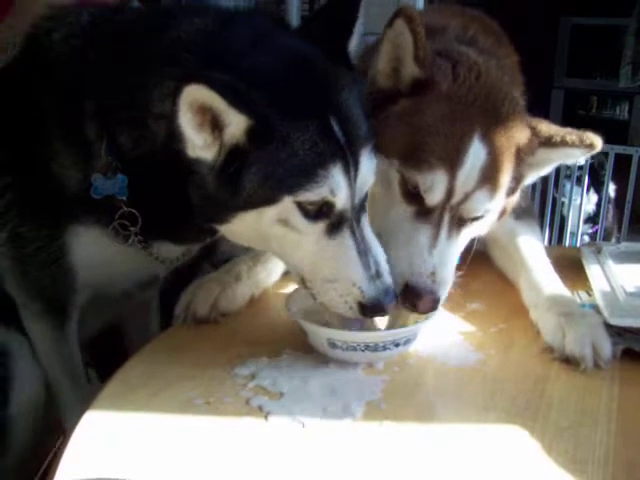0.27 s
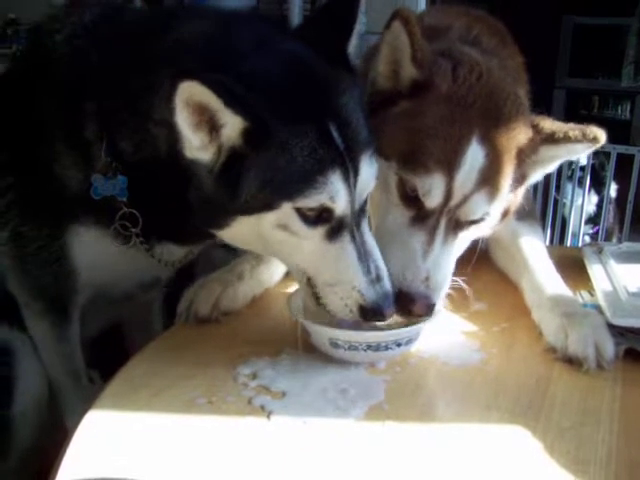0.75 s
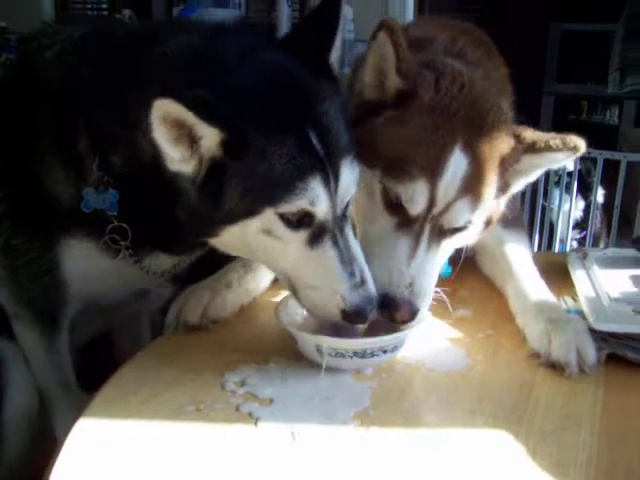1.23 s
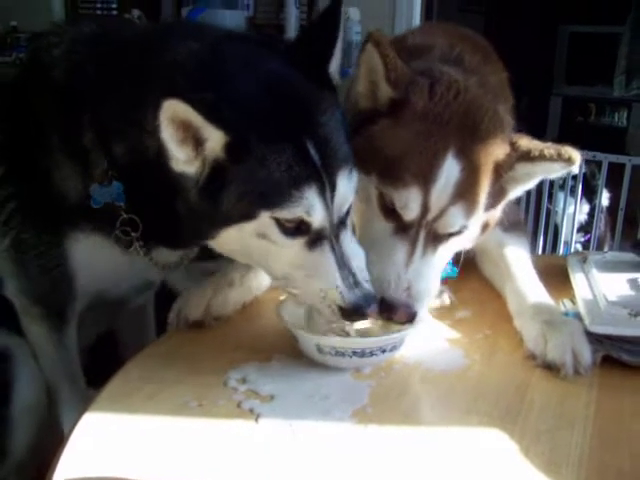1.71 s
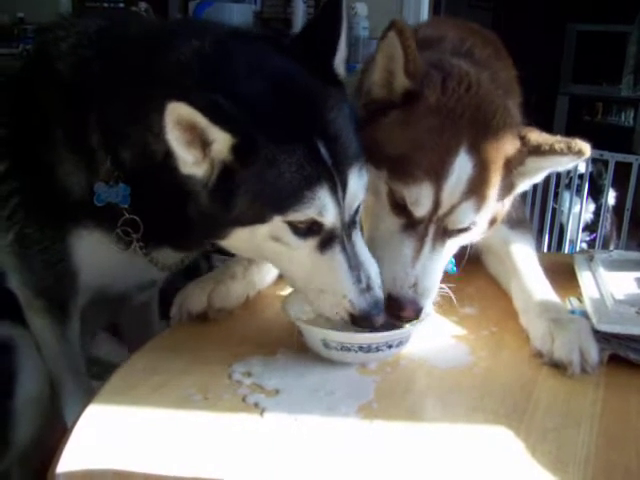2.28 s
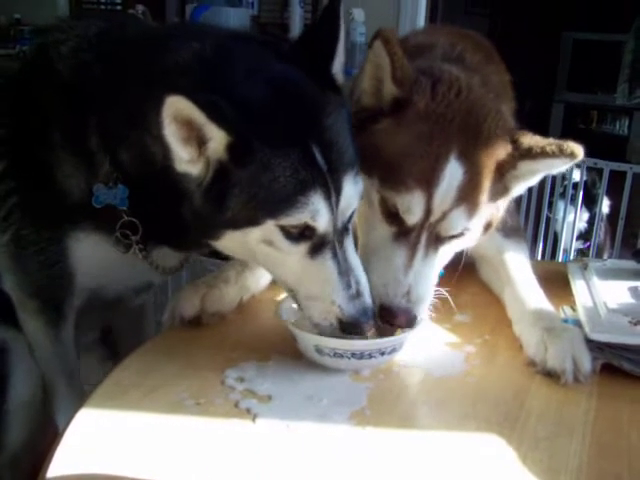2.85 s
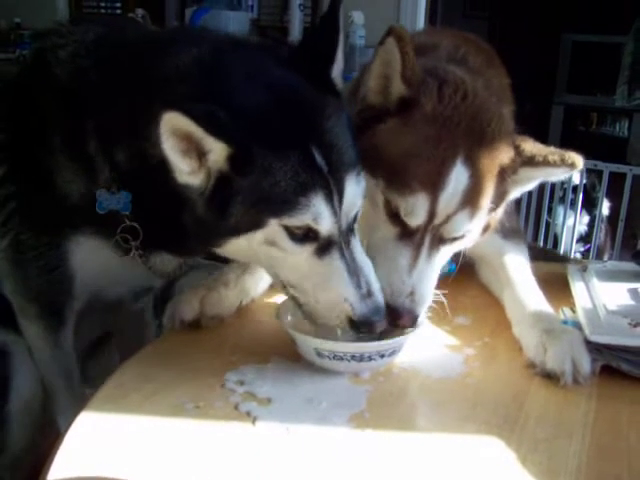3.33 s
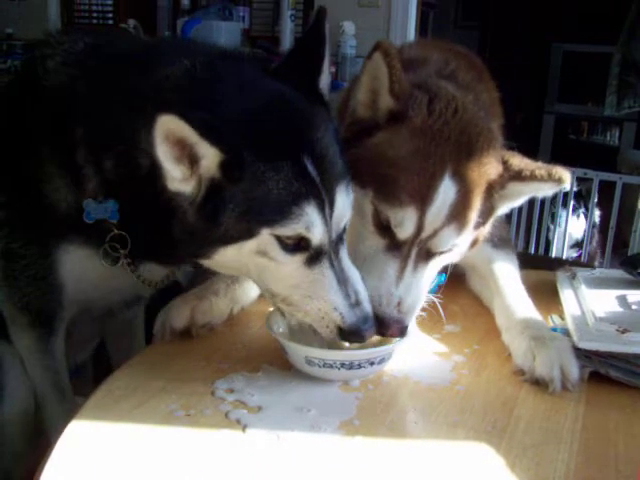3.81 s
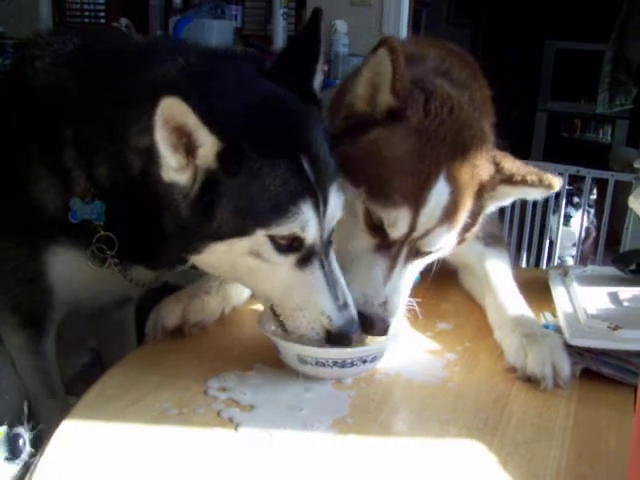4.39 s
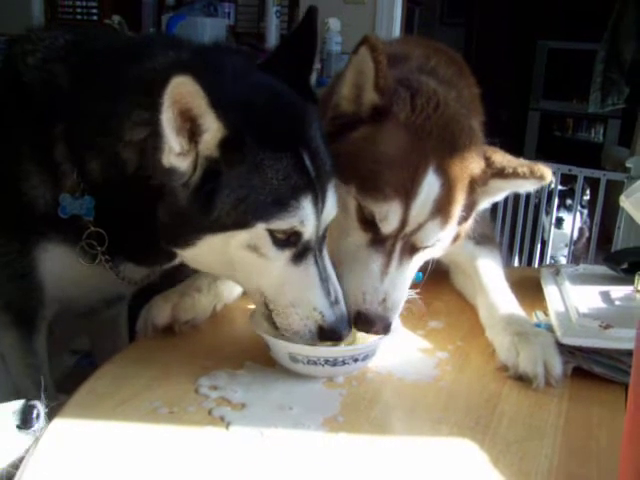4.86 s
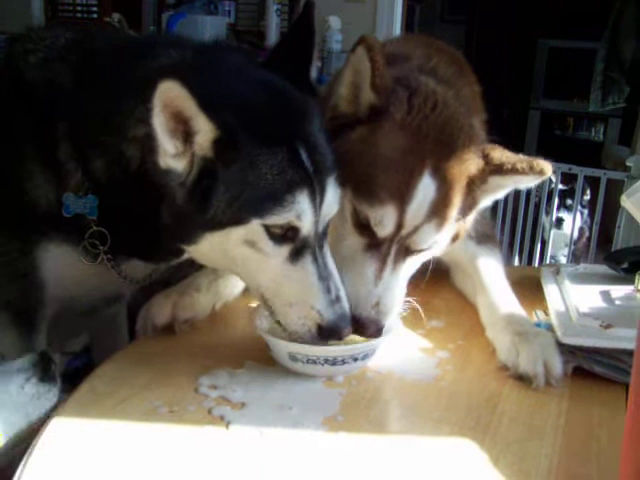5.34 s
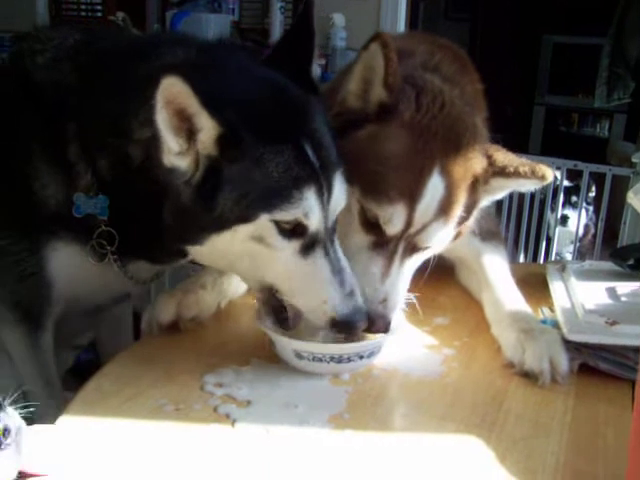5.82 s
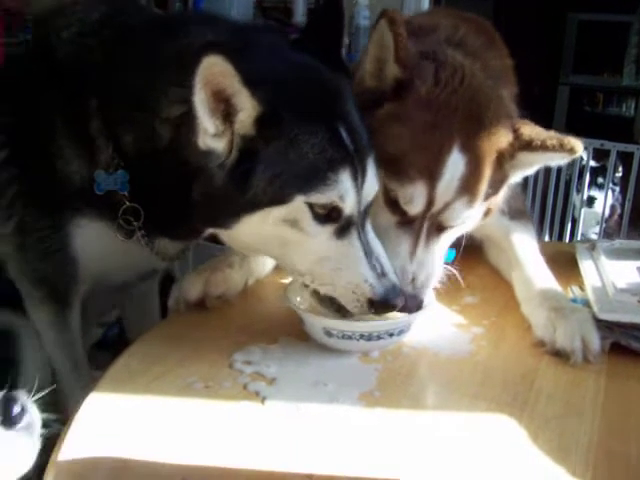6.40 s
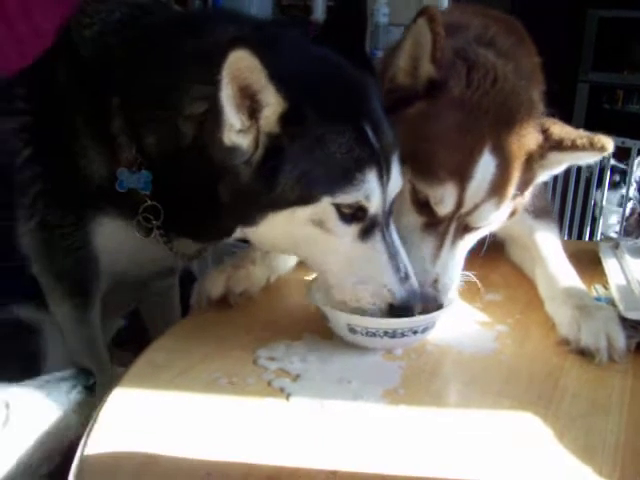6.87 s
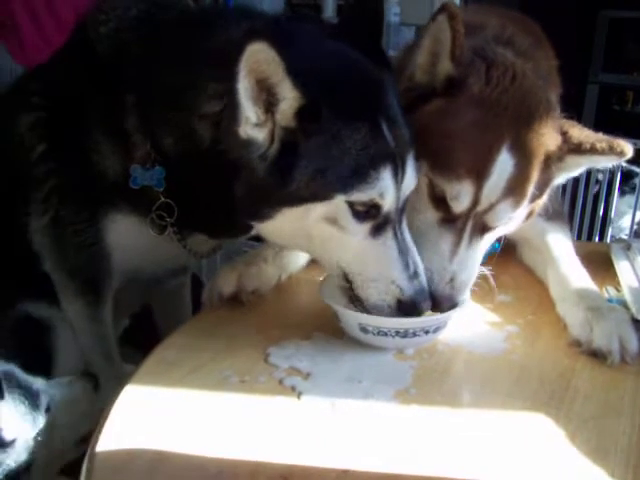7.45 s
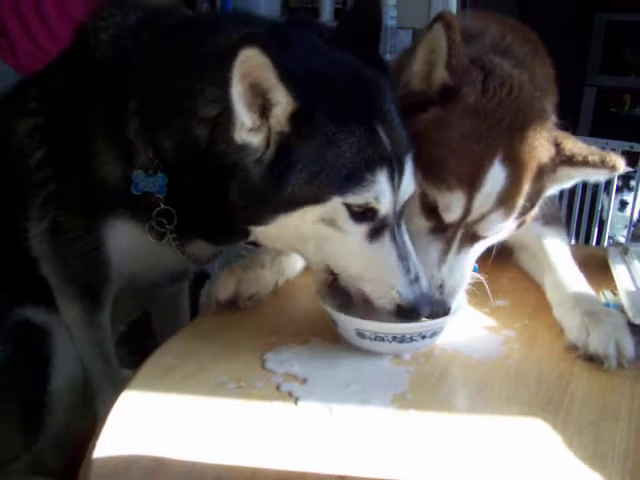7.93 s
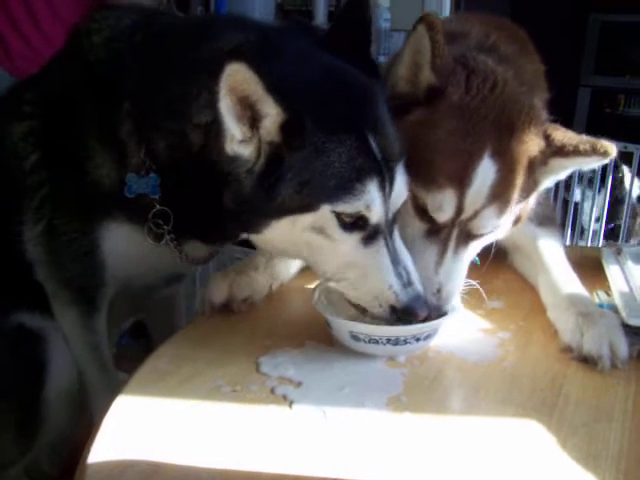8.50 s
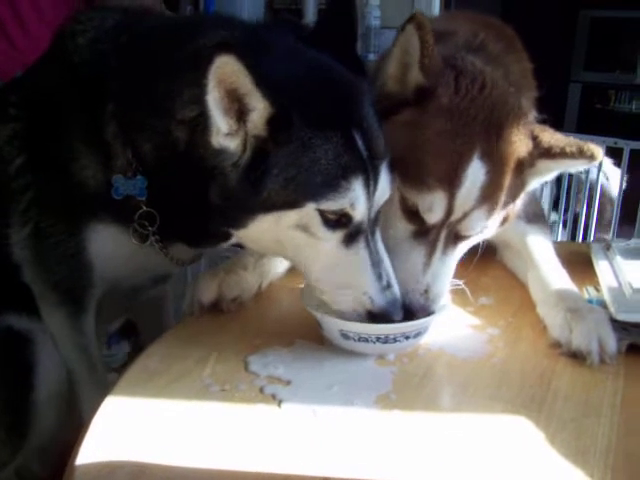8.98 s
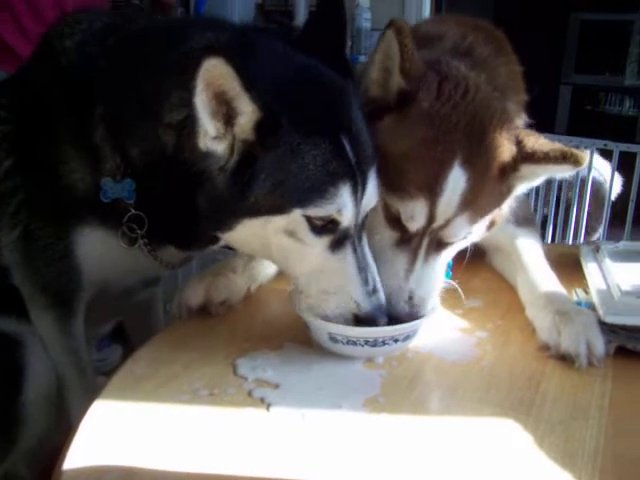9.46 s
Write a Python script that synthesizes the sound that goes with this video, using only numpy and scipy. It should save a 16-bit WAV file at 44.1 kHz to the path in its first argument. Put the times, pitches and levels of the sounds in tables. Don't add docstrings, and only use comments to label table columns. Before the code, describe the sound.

Two dogs lap milk from a small bowl at close range, fast wet slaps, hollow plops, gurgles and bright smacks over faint room hum.

```python
import sys
import numpy as np
from scipy import signal
from scipy.fft import rfft, irfft, next_fast_len
from scipy.io import wavfile

SR = 44100
rng = np.random.default_rng(int(sys.argv[2]) if len(sys.argv) > 2 else 0)


def wav_record(signal):
    frames = np.transpose(np.atleast_2d(signal))
    bounded = np.clip(frames, -1, 1)
    quanta = np.round(bounded * 32767).astype(np.int16)
    wavfile.write(sys.argv[1], SR, quanta)


def gain_from_db(level_db):
    decades = np.asarray(level_db, float) / 20
    return 10 ** decades


N = 428211
TOP_HZ = 10000

# start_s, length_s, gurgle_db, spray_db
NEAR_LAPS = [(0.0, 0.013, -22.5, -24.5), (0.293, 0.081, -33, -24), (0.688, 0.16, -26.5, -26),
             (1.098, 0.11, -29.5, -22.5), (1.495, 0.045, -26, -24.5), (1.794, 0.11, -25, -27.5),
             (2.16, 0.024, -21.5, -21), (2.544, 0.078, -26.5, -26.5), (2.852, 0.055, -24, -28),
             (3.126, 0.16, -25.5, -26), (3.529, 0.14, -25, -24.5), (3.947, 0.14, -25, -26),
             (4.303, 0.15, -27, -26), (4.73, 0.065, -27.5, -29.5), (5.065, 0.11, -25.5, -25.5),
             (5.413, 0.17, -34, -25.5), (5.842, 0.045, -31.5, -26), (6.082, 0.018, -30.5, -28),
             (6.498, 0.088, -26.5, -24.5), (6.897, 0.11, -27, -27), (7.292, 0.06, -24, -22),
             (7.619, 0.046, -20, -36), (7.662, 0.029, -40, -20.5), (7.965, 0.049, -38.5, -24),
             (8.065, 0.037, -29.5, -17), (8.39, 0.053, -27, -27), (8.687, 0.08, -26, -24.5),
             (9.046, 0.11, -35, -31.5), (9.432, 0.071, -32, -32), (9.583, 0.018, -28, -24),
             (8.912, 0.039, -32.5, -33), (1.28, 0.098, -40, -24.5)]
FAR_LAPS = [(0.09, 0.12, -27, -23), (0.37, 0.24, -29.5, -23.5), (1.001, 0.033, -25.5, -28.5),
            (1.362, 0.068, -21.5, -20.5), (1.62, 0.053, -43, -24), (1.687, 0.26, -23.5, -24.5),
            (2.002, 0.1, -26, -22.5), (2.283, 0.095, -38, -26), (2.463, 0.013, -23, -26.5),
            (2.703, 0.11, -29.5, -25), (3.028, 0.01, -31, -32), (3.402, 0.024, -29.5, -21.5),
            (3.869, 0.056, -31, -23), (4.233, 0.06, -33.5, -23.5), (4.648, 0.1, -26, -23),
            (4.854, 0.15, -37, -31), (5.257, 0.08, -29, -31), (5.665, 0.1, -29, -33),
            (5.938, 0.082, -30, -35), (6.138, 0.088, -32, -30), (6.43, 0.018, -22.5, -23.5),
            (6.796, 0.042, -35, -27.5), (7.189, 0.012, -26, -24), (7.458, 0.52, -41.5, -27.5),
            (7.821, 0.038, -35, -22), (8.185, 0.12, -32.5, -29.5), (8.515, 0.053, -25, -25.5),
            (8.765, 0.049, -27.5, -30), (9.183, 0.25, -29.5, -30.5), (9.333, 0.035, -34, -26)]
LAP_S, LAP_LENGTH_S, GURGLE_DB, SPRAY_DB = np.transpose([*NEAR_LAPS, *FAR_LAPS])
SLAP_RISE_DB_PER_S = 896.5
DOG_RISE_DB_PER_S = np.repeat([258, 899], [len(NEAR_LAPS), len(FAR_LAPS)])

# start_s, level_db, pitch_hz
POPS = [(.502, -8.5, 1003), (1.006, -5.5, 903), (1.364, -10, 990), (1.517, -5, 846), (1.841, -6, 1630),
        (2.306, -14, 732), (2.555, -12, 730), (3.413, -13.5, 1007), (3.539, -4, 1580), (3.885, -8.5, 620),
        (4.752, -8.5, 900), (5.407, -13, 733), (5.513, -10.5, 864), (5.644, -20, 750), (5.844, -7.5, 844),
        (5.939, -6, 955), (6.153, -12.5, 1470), (6.419, -9, 940), (6.503, -9, 970), (6.551, -4, 910),
        (6.786, -10, 953), (6.921, -7.5, 702), (7.272, -21, 644), (8.515, -16.5, 1023), (8.781, -11, 887),
        (9.311, -4, 934), (9.302, -8.5, 866)]
# start_s, level_db, pitch_hz
PLIPS = [(.7, -12.5, 1084), (2.452, -23, 1050), (2.712, -6.5, 1030), (2.78, -16, 1580), (3.035, -14, 1020),
         (3.941, -13, 1260), (4.025, -14.5, 1010), (4.207, -22, 1200), (4.246, -9.5, 865),
         (4.415, -9.5, 990), (4.807, -9.5, 980), (4.963, -16.5, 880), (5.131, -7.5, 1030),
         (5.264, -14, 890), (5.424, -11.5, 770), (5.814, -20, 1130), (5.863, -12.5, 1090),
         (7.187, -11, 1050), (7.615, -14, 1560), (7.79, -15, 645), (7.809, -7, 840), (7.838, -11.5, 824),
         (8.061, -9, 1250), (8.459, -17, 1160), (8.667, -18, 890), (9.012, -17, 924), (9.461, -10.5, 920)]
# start_s, level_db, pitch_hz
GLUGS = [(.158, -16.5, 1200), (.253, -21.5, 702), (.305, -14, 924), (.449, -14, 566), (.768, -15.5, 1100),
         (1.091, -17.5, 712), (1.734, -10.5, 1040), (1.802, -18, 637), (2.327, -22, 1018),
         (3.2, -11.5, 1038), (3.871, -16.5, 1012), (4.644, -6, 994), (4.989, -13, 1720), (5.279, -21, 960),
         (5.383, -16.5, 1030), (5.663, -14, 988), (5.682, -13.5, 1310), (6.08, -13, 1004),
         (7.654, -16, 810), (8.037, -18.5, 825), (8.377, -12, 1660), (8.496, -15, 1600), (8.64, -20.5, 650),
         (8.822, -11.5, 1730), (9.189, -13.5, 1590)]
POCKETS = sorted((*row, cycles) for rows, cycles in [(POPS, 6.1), (PLIPS, 12.5), (GLUGS, 26)]
                 for row in rows)


def rms_one(x):
    return x / np.sqrt(np.mean(x ** 2) + 1e-20)


def at_hz(points, hz):
    point_hz, point_db = np.transpose(points)
    return np.interp(np.log(hz), np.log(point_hz), point_db)


def drift(rate):
    r = np.exp(-80 * np.pi * rate / SR)
    noise = rng.standard_normal(N // 40 + 2002)
    slow = signal.lfilter([1], [1, -2 * r, r * r], noise)[2000:]
    return np.interp(np.arange(N) / 40, np.arange(len(slow)), rms_one(slow))


def ring(clicks, hz, t60):
    r, w = gain_from_db(-60 / (t60 * SR)), 2 * np.pi * hz / SR
    return signal.lfilter([0, np.sin(w)], [1, -2 * r * np.cos(w), r * r], clicks + 1e-18)


def coloured(spectrum):
    size = next_fast_len(N)
    hz = np.maximum(np.arange(size // 2 + 1) * SR / size, 1)
    shaped = rfft(rng.standard_normal(size)) * gain_from_db(at_hz(spectrum, hz))
    return rms_one(irfft(shaped, size)[:N])


def add(out, s, sound):
    i = max(round(s * SR), 0)
    out[i:i + len(sound)] += sound[:N - i]


def pocket(hz, cycles, rise, swell=0.24):
    turns = np.arange(int(1.5 * cycles * SR / hz)) * hz / SR
    shape = (1 - np.exp(-turns / swell)) * np.exp(-6.9 * turns / cycles)
    return shape / shape.max() * np.sin(2 * np.pi * turns * (1 + rise * turns / cycles))


def background():
    # pitch_hz, level_db (per Hz)
    room_tone = [(13, -36), (22, -12), (48, -11), (108, -6), (183, 5.5), (294, -2), (359, 3), (410, 0),
                 (520, -8), (680, -16.5), (1140, -120)]
    # pitch_hz, level_db (per Hz)
    mic_hiss = [(400, -40), (550, -11), (1600, -16), (3800, -4), (6500, -17), (9000, -30)]
    # pitch_hz, width_hz, level_db
    motor_lines = [(51.7, 8, -55.5), (182.6, 6, -51)]
    out = gain_from_db(-41) * coloured(room_tone) + gain_from_db(-43) * coloured(mic_hiss)
    for hz, width, db in motor_lines:
        out += gain_from_db(db) * rms_one(ring(rng.standard_normal(N), hz, 2.1 / width))
    return out


def lapping(starts, lengths, strengths_db, rises, sag, fall):
    time = np.arange(0, N + 40, 40) / SR
    power = gain_from_db(2 * -46.5)
    for s, length, db, rise in zip(starts, lengths, strengths_db, rises):
        since = time - s
        loss = rise * np.maximum(-since, 0)
        loss += sag * np.clip(since, 0, length)
        loss += fall * np.maximum(since - length, 0)
        power = power + gain_from_db(2 * (db - np.minimum(loss, 200)))
    return np.interp(np.arange(N) / SR, time, np.sqrt(power))


def bubbles(low_hz, high_hz, cycles, spread_db, rise, count, follow=0):
    out = np.zeros(N)
    plop_s, _, plop_hz, _ = np.transpose(POCKETS)
    for when, size, force, climb in rng.random((count, 4)):
        s = when * N / SR
        latest_hz = plop_hz[max(np.searchsorted(plop_s, s) - 1, 0)]
        hz = low_hz * (high_hz / low_hz) ** size
        hz *= (np.clip(latest_hz, low_hz, high_hz) / hz) ** follow
        db = -spread_db * np.log(.08 + force)
        add(out, s, gain_from_db(db) * pocket(hz, cycles * (.5 + climb), rise * climb ** 2, swell=1.4))
    return rms_one(out)


def gurgle():
    gain = lapping(LAP_S, LAP_LENGTH_S, GURGLE_DB, np.full(len(LAP_S), SLAP_RISE_DB_PER_S),
                   sag=46.5, fall=255.5)
    return gain * gain_from_db(-3.5) * bubbles(450, 1400, cycles=11, spread_db=2.2, rise=.5, count=2400, follow=.3)


def slurp():
    # start_s, level_db
    wide_sucks = [(1.001, -31), (1.37, -22), (1.41, -27), (2.051, -17), (2.17, -36), (2.881, -18.5),
                  (3.42, -34), (5.44, -20.5), (5.94, -29), (6.208, -23), (6.921, -26), (7.66, -24),
                  (9.301, -39)]
    suck_s, suck_db = np.transpose(wide_sucks)
    count = len(suck_s)
    slurp_db = .52 * GURGLE_DB + .48 * SPRAY_DB + 3.5 - .53 * LAP_S
    gain = lapping(LAP_S, LAP_LENGTH_S, slurp_db, DOG_RISE_DB_PER_S, sag=30.5, fall=197)
    gain += lapping(suck_s, np.full(count, .0049), suck_db, np.full(count, SLAP_RISE_DB_PER_S),
                    sag=30.5, fall=197)
    return gain * gain_from_db(-11) * bubbles(1150, 2710, cycles=20, spread_db=.5, rise=1, count=3200)


def droplets(spectrum, per_s, cycles, spread_db, clump_db, patch_db, count):
    sizes = gain_from_db(spread_db * np.minimum(rng.exponential(1, N), 4)) * rng.choice([-1, 1], N)
    born = sizes * (rng.random(N) < per_s * gain_from_db(clump_db * drift(30)) / SR)
    dealt = rng.integers(0, count, N)
    swells = [gain_from_db(patch_db * drift(19)) for k in range(count // 3 + 1)]
    out = 0
    for k, hz in enumerate(np.geomspace(spectrum[1][0], spectrum[-2][0], count)):
        drive = born * (dealt == k) * swells[k // 3]
        burst = ring(ring(drive, hz, cycles / hz), hz, .5 * cycles / hz)
        out = out + hz ** 2 * gain_from_db(at_hz(spectrum, hz)) * burst
    return rms_one(signal.sosfilt(signal.butter(2, 1500, "high", fs=SR, output="sos"), out))


def spray_texture():
    # pitch_hz, level_db (per Hz)
    droplet_colour = [(1180, -38), (2000, -9), (2450, 0), (4040, 5), (6680, -10), (7410, -26.5),
                      (8640, -10.5), (11200, -65.5), (19000, -120)]
    # pitch_hz, level_db (per Hz)
    mist_colour = [(1500, -21), (2600, -6.5), (4000, 1.5), (6000, -21), (7600, -16), (9500, -27)]
    drops = droplets(droplet_colour, per_s=3800, cycles=30, spread_db=-.5, clump_db=3.5, patch_db=3.8, count=33)
    return drops + gain_from_db(-5) * coloured(mist_colour)


def lap_spray(spray):
    gain = lapping(LAP_S, LAP_LENGTH_S, SPRAY_DB, DOG_RISE_DB_PER_S, sag=3.5, fall=137)
    crackle = bubbles(4800, TOP_HZ, cycles=13, spread_db=8.5, rise=.13, count=700)
    return gain * (gain_from_db(-5.5) * spray + gain_from_db(-26.5) * crackle)


def drips():
    # start_s, level_db, pitch_hz, length_cycles, glide (share of pitch)
    single_drops = [(0.0052, -8.5, 1700, 19, 0), (0.00795, -15.5, 720, 4.8, 0), (.066, -22, 603, 20, 0),
                    (4.433, -11.5, 1103, 29, 0.16), (4.992, -23, 2200, 60, 0.93),
                    (6.039, -19.5, 4820, 270, 0.043), (6.039, -31, 3050, 230, 0),
                    (7.998, -22, 1740, 87, 0.062), (8.077, -12.5, 820, 13, 0.0068),
                    (6.919, -9.5, 1450, 32, 0.18), (7.196, -17, 1053, 63, 0.75),
                    (6.789, -20, 1050, 46, 0.23), (6.936, -17, 790, 13, 0.12)]
    out = np.zeros(N)
    for s, db, hz, cycles, glide in single_drops:
        add(out, s, gain_from_db(db) * pocket(hz, cycles, glide))
    return out


def snaps():
    # start_s, level_db
    film_snaps = [(1.361, -7), (3.0244, -6), (3.871, -8), (4.6376, -11.5), (4.732, -23), (5.139, -15),
                  (5.937, -11.5), (6.418, -14), (6.428, -13.5), (6.783, -8), (7.182, -16), (8.514, -10)]
    # start_s, level_db
    rim_flecks = [(0.015, -21), (0.043, -18), (.0947, -25), (1.1692, -20), (1.8886, -24), (2.333, -19),
                  (3.3648, -27), (3.9399, -18), (4.1073, -21), (4.243, -15), (5.628, -20), (5.774, -23.5),
                  (6.0372, -18.5), (6.113, -17.5), (6.3107, -22.5), (6.669, -22), (6.8703, -23),
                  (9.0264, -22.5), (9.3537, -22)]
    out = np.zeros(N)
    for s, db in [*film_snaps, *rim_flecks]:
        for k, chance in enumerate(rng.random(3)):
            tick = pocket(5700 + 2300 * chance, cycles=16, rise=0)
            add(out, s + k * (.00063 + .0017 * chance), gain_from_db(db - .18 * k) * tick)
    return out


def burbles():
    # start_s, level_db, pitch_hz
    small_pockets = [(0.1, -17, 765), (0.115, -19, 1780), (0.167, -16, 1180), (0.175, -15, 1740),
                     (0.319, -14, 880), (0.335, -20, 794), (0.382, -19, 790), (0.481, -21, 1260),
                     (0.491, -16, 1260), (0.527, -15, 1120), (0.714, -20.5, 464), (0.794, -19.5, 784),
                     (1.005, -6, 1530), (1.107, -23, 795), (1.132, -13, 865), (1.136, -23, 1970),
                     (1.147, -16.5, 1920), (1.336, -22, 1270), (3.557, -18, 1050), (1.392, -17, 1310),
                     (1.426, -12.5, 1440), (1.485, -14, 730), (1.842, -16, 646), (2.057, -13.5, 766),
                     (2.065, -20, 1360), (2.16, -21, 1870), (2.176, -13, 1760), (2.343, -12, 1070),
                     (2.489, -16, 1680), (2.488, -19, 1250), (2.563, -13, 1180), (2.594, -17, 1640),
                     (2.786, -18, 1100), (2.903, -21, 766), (3.036, -13.5, 1550), (3.047, -16.5, 830),
                     (3.129, -18, 1140), (3.131, -16, 1980), (3.421, -12, 2080), (3.577, -15.5, 990),
                     (3.608, -15.5, 1210), (3.654, -19, 915),
                     (3.884, -19.5, 2000), (3.972, -21, 810), (4, -17.5, 1230), (4.339, -11.5, 1940),
                    (4.393, -15.5, 1000), (4.709, -17.5, 684), (9.16, -22.5, 1800), (4.789, -18, 1790),
                    (5.091, -21, 870), (5.139, -19, 1160), (5.299, -15, 1090), (5.31, -12, 980),
                    (5.444, -19, 875), (5.82, -18, 1150), (5.946, -11.5, 1730), (6.09, -11, 955),
                    (6.178, -19.5, 910), (6.425, -11.5, 2260), (6.33, -20.5, 2710), (6.503, -14, 1660),
                    (6.607, -16, 910), (6.959, -14.5, 960), (6.97, -14, 790), (7.222, -12.5, 1800),
                    (7.247, -20.5, 650), (7.272, -16, 1250), (7.294, -16, 1000), (7.331, -14, 830),
                    (7.342, -26, 955), (6.33, -28, 1300), (7.662, -10, 1800), (7.668, -13, 740),
                    (8.074, -16, 1760), (8.226, -14.5, 2150), (8.406, -18, 1720), (8.518, -10, 1110),
                    (8.679, -17.5, 980), (8.69, -17.5, 776), (8.82, -21.5, 785), (9.025, -14.5, 854),
                    (9.248, -18, 810), (9.263, -16.5, 1780), (9.309, -9.5, 1670), (9.331, -11.5, 1430),
                    (9.427, -20.5, 533)]
    # start_s, level_db, pitch_hz
    tongue_drops = [(0.165, -10, 2780), (0.325, -17, 2720), (4.058, -18, 4500), (6.726, -21.5, 3760),
                    (0.58, -18, 3490), (0.727, -14, 3820), (1.082, -15, 4950), (6.592, -19, 4320),
                    (1.519, -22, 3320), (1.656, -15, 4170), (1.82, -20, 3660), (1.989, -15, 3730),
                    (2.07, -19, 5380), (2.083, -9, 4760), (2.324, -17.5, 4470), (2.888, -18, 5960),
                    (3.264, -18, 3810), (3.402, -11, 4440), (3.415, -11, 3230), (3.427, -11, 3100),
                    (3.441, -8, 4180), (3.883, -13, 6240), (3.968, -15.5, 5600), (3.98, -14, 2960),
                    (3.987, -15, 2840), (4.294, -16, 4800), (4.343, -13, 4470), (4.868, -15, 3500),
                    (5.068, -16.5, 4030), (5.136, -13, 4410), (5.151, -12, 4720), (5.428, -14, 3970),
                    (5.427, -18.5, 2560), (5.844, -13, 3120), (6.975, -10.5, 4400), (6.989, -16, 4390),
                    (7.546, -12, 3900), (8.118, -21, 3730), (8.129, -18, 4090), (8.191, -19, 5020)]
    out = np.zeros(N)
    for s, db, hz in small_pockets:
        add(out, s - .0013, gain_from_db(db) * pocket(hz, cycles=12.8, rise=.038, swell=2.2))
    for s, db, hz in tongue_drops:
        add(out, s + .0022, gain_from_db(db) * pocket(hz, cycles=52, rise=.072))
    return out


def smacks(spray):
    # start_s, level_db, pitch_hz
    dry_smacks = [(0.1492, 1, 5230), (0.523, -0.5, 5500), (0.8, -13, 2950), (1.012, -15, 4400),
                  (0.994, -10, 4230), (7.05, -26, 6300), (9.309, -12, 6540), (9.4934, -19, 6800),
                  (8.369, -18, 6200), (8.747, -20, 6800), (4.62, -35, 7400), (0.745, -17, 7500),
                  (1.699, -13, 2660), (1.7283, -4.5, 3380), (1.9097, -8, 3450), (2.069, -8, 3700),
                  (2.5589, -1, 4240), (2.7047, -16, 4820), (2.8844, -11.5, 2630), (3.0255, -7, 3300),
                  (3.0468, -0.5, 4200), (3.4018, 1.5, 6200), (4.399, -10.5, 4600), (4.641, -6.5, 3900),
                  (4.7517, -7, 2830), (4.8295, -7.5, 4900), (5.1242, -4.5, 5500), (5.3174, -3, 4200),
                  (5.509, -1.5, 6300), (5.69, -9, 4440), (5.8169, -4, 3170), (5.9422, -3.5, 4350),
                  (7.223, -12, 4400), (7.483, -19, 3150), (7.7768, -9.5, 3780), (6.208, -14, 2460),
                  (8.4078, -10, 2580)]
    # start_s, level_db, pitch_hz
    wet_smacks = [(0.692, -17, 4270), (1.003, -7.5, 4300), (1.344, -14, 3380), (1.542, -22, 4420),
                  (1.6146, -10.5, 3600), (2.0853, -18, 4720), (2.168, -8.5, 3720), (5.929, -17, 4000),
                  (2.4867, -20, 3960), (3.1317, -32, 3900), (3.2144, -11, 3700), (3.4395, -20, 4170),
                  (3.603, -12.5, 3360), (3.8732, -10, 3200), (9.158, -24, 3500), (4.224, -9.5, 3460),
                  (4.8578, -11, 3180), (6.4177, -7.5, 4270), (6.783, -10.5, 4030), (8.287, -14.5, 3600),
                  (6.96, -11.5, 4370), (7.186, -13.5, 4550), (7.316, -20, 3360), (7.6633, -14, 4080),
                  (8.207, -9.5, 3760), (8.5168, -12, 3160), (8.9816, -15.5, 3590), (9.2204, -14, 3250),
                  (9.3346, -14, 3150), (9.492, -15.5, 4250)]
    out = np.zeros(N)
    fade = gain_from_db(-60 * np.arange(int(.2 * SR)) / (.08 * SR))
    for contacts, splash_db in [(dry_smacks, -22.5), (wet_smacks, -13)]:
        for s, db, hz in contacts:
            add(out, s - .0004, gain_from_db(db) * pocket(hz, cycles=12, rise=.15))
            thrown = spray[round(s * SR):][:len(fade)]
            voiced = signal.lfilter(*signal.iirpeak(hz, 2.5, fs=SR), thrown)
            splash = fade[:len(thrown)] * (1.6 * voiced + .38 * thrown)
            add(out, s, gain_from_db(db + splash_db) * splash)
    return out


def plops():
    out = np.zeros(N)
    for s, db, hz, cycles in POCKETS:
        climb, mate = rng.random(2)
        cycles = np.clip(cycles, 6.5, 40)
        add(out, s - .0007, gain_from_db(db - 1) * pocket(hz, cycles, rise=.1 + .4 * climb, swell=1.8))
        add(out, s + .002, gain_from_db(db - 8) * pocket(hz * (1.4 + .6 * mate), 1.5 * cycles, rise=.2))
    return out


def specks():
    # start_s, level_db
    bead_bursts = [(0.6175, -29), (1.4164, -20), (1.5449, -19), (1.6008, -29), (1.6821, -29), (1.7, -29),
                   (1.7993, -17), (1.9334, -29), (2.0954, -28), (2.172, -14), (2.4598, -22), (2.5356, -23),
                   (3.7599, -19), (4.4304, -18), (4.7644, -25), (4.969, -22), (5.0719, -20), (5.1437, -13),
                   (5.2869, -23), (5.5483, -21), (7.3657, -19), (7.6545, -19), (7.667, -14), (7.8414, -11),
                   (8.1913, -29)]
    out = np.zeros(N)
    for s, db in bead_bursts:
        add(out, s, gain_from_db(db) * pocket(6200, cycles=13, rise=.2))
    return out


def gulps():
    # start_s, level_db, pitch_hz
    low_pushes = [(0.703, -22, 430), (1.506, -25, 217), (2.55, -20, 324), (3.502, -19, 230),
                  (3.515, -16.5, 256), (3.538, -16.5, 213), (5.135, -17.5, 420), (5.265, -23.5, 225),
                  (5.836, -23, 222), (8.17, -23.5, 245), (8.494, -10.5, 243), (8.499, -16.5, 247),
                  (9.028, -23, 223)]
    out = np.zeros(N)
    for s, db, hz in low_pushes:
        add(out, s - .002, gain_from_db(db) * pocket(hz, cycles=6.7, rise=.059))
    return out


def kitchen(x):
    t60_s, wall_cut_hz = .18, 2770
    time = np.arange(SR // 2) / SR
    build_up = np.clip(time / .004 - .5, 0, 1)
    echoes = rng.standard_normal(len(time)) * gain_from_db(-60 * time / t60_s) * build_up
    echoes = signal.lfilter(*signal.butter(1, wall_cut_hz, fs=SR), echoes)
    return signal.fftconvolve(x, echoes / np.sqrt(np.sum(echoes ** 2)))[:N]


def scene():
    spray = spray_texture()
    bowl = gurgle() + slurp() + lap_spray(spray)
    bowl += drips() + snaps() + burbles() + smacks(spray) + plops() + specks() + gulps()
    return (bowl + gain_from_db(-12) * kitchen(bowl) + background())[None]


def top_cut(x):
    return signal.sosfilt(signal.butter(12, 15850, fs=SR, output="sos"), x)


def record(dry):
    # start_s, level_db
    overload_cracks = [
        (.5232, -21),
        (1.3632, -17),
        (3.0249, -25),
        (3.0467, -19),
        (5.1399, -22),
        (5.9406, -31),
    ]
    clipped = np.clip(dry, -.62, .62)
    dull = signal.sosfilt(signal.butter(8, TOP_HZ, fs=SR, output="sos"), clipped)
    cut = signal.sosfilt(signal.cheby2(10, 70, 9900, fs=SR, output="sos"), dull)
    for s, db in overload_cracks:
        add(cut[0], s, gain_from_db([db]))
    return top_cut(cut)


dry = scene()
out = record(dry)
wav_record(out)
```